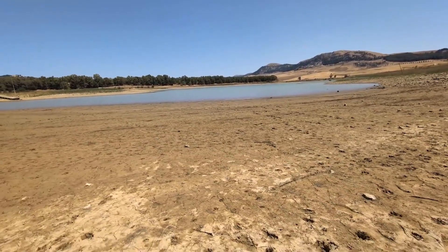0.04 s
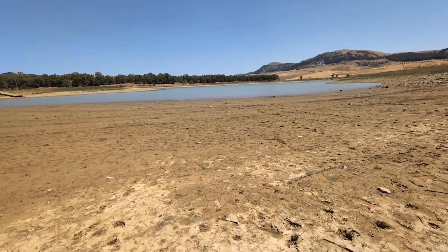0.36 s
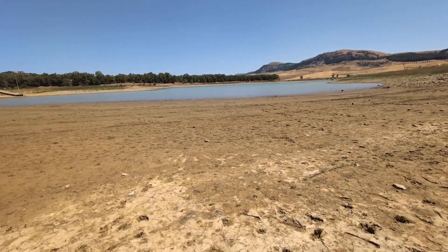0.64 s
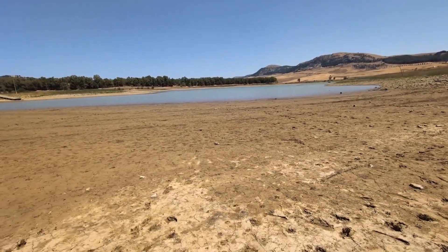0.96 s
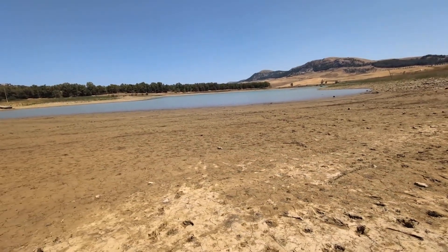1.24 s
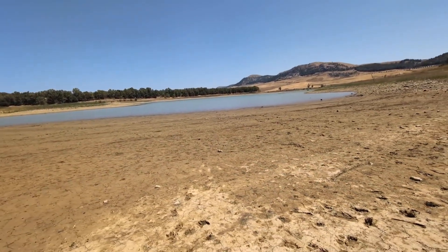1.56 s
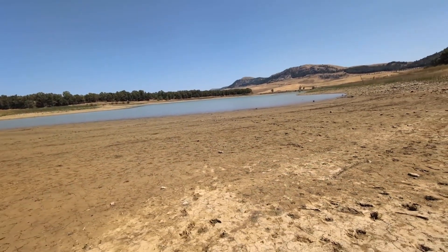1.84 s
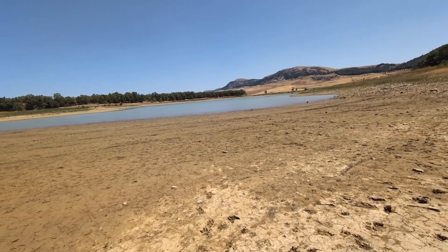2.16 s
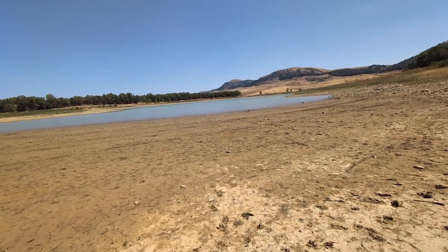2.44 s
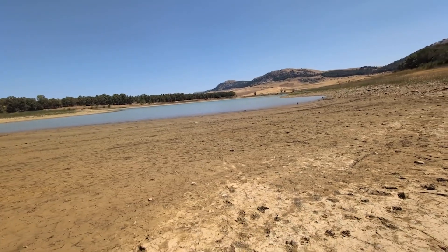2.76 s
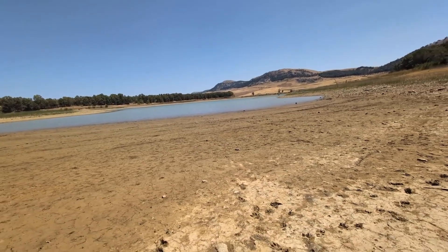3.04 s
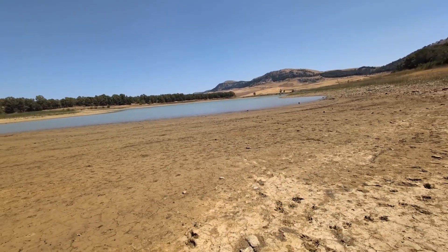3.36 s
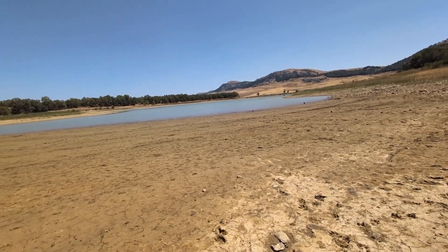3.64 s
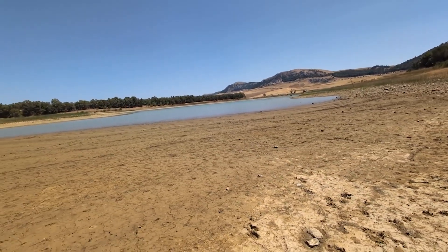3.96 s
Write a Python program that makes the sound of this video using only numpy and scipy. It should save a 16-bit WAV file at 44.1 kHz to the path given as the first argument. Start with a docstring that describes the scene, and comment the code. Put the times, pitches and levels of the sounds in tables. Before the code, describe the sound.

Crunchy steps on dried mud at a slow walk, with low fluttering wind.

```python
"""Slow footsteps on a dry, cracked lake bed, heard from a hand-held camera in light wind.
Each heel scuffs the crust, the sole rolls on and crumbles it, and loose grit settles with a fading hiss.
Clods crack with damped pops; hard grains tick. Wind rumbles, flutters and thumps on the two
microphone ports, over a faint hiss of open air."""
import sys
import numpy as np
from scipy import signal
from scipy.fft import rfft, irfft
from scipy.io import wavfile
from scipy.ndimage import uniform_filter1d

SR = 44100
rng = np.random.default_rng(int(sys.argv[2]) if len(sys.argv) > 2 else 0)


def dump(signal):
    """Clip the signal to [-1, 1] and save it as 16-bit WAV at the path in sys.argv[1]."""
    limited = np.clip(np.atleast_2d(signal).T, -1, 1)
    pcm = np.round(limited * 32767).astype(np.int16)
    wavfile.write(sys.argv[1], SR, pcm)


N = 176400
T = np.arange(N) / SR
HZ = np.fft.rfftfreq(N, 1 / SR)

# spectrum of scraped crust and crumbs (frequency [Hz], relative level [dB])
SCRAPE_SPECTRUM = [(150, -41), (450, 3), (900, -1), (1400, -3.5), (2100, -3), (2900, -14), (5000, -23),
                   (15000, -47)]


def amp(db):
    """Decibels to gain."""
    return 10 ** (np.asarray(db) / 20)


def unit(x):
    """Scale to rms 1."""
    return x / np.sqrt(np.mean(x ** 2) + 1e-20)


def curve(points):
    """Interpolate (frequency, value) points onto HZ, on a log axis."""
    hz, value = np.transpose(points)
    return np.interp(np.log(HZ + 1), np.log(hz), value)


def colour(x, spectrum):
    """Minimum-phase filter; output rms 1."""
    log_gain = np.log(amp(curve(spectrum)))
    phase = -signal.hilbert(np.r_[log_gain, log_gain[-2:0:-1]]).imag[:len(HZ)]
    return unit(irfft(rfft(x) * np.exp(log_gain + 1j * phase), N))


def add(mix, start_s, sound):
    """Mix a sound in at start_s."""
    part = mix[..., max(round(start_s * SR), 0):][..., :sound.shape[-1]]
    part += sound[..., :part.shape[-1]]


def patchy(x, depth_db=2.6, patch_hz=300, patch_s=.03):
    """Vary a hiss in random time-frequency patches; output rms 1."""
    frames = signal.stft(x, nperseg=512, noverlap=384)[2]
    field = rng.standard_normal(frames.shape[-2:])
    field = uniform_filter1d(field, round(patch_hz * 512 / SR), axis=0)
    field = uniform_filter1d(field, round(patch_s * SR / 128), axis=1)
    frames *= amp(depth_db * unit(field))
    return unit(signal.istft(frames, nperseg=512, noverlap=384)[1][..., :N])


def air(level_db=-77.5):
    """Faint hiss of open air."""
    # air spectrum (frequency [Hz], relative level [dB])
    air_spectrum = [(100, 0), (500, -1), (1000, -7), (1700, -8), (2500, -11), (3300, -15), (6000, -18),
                    (10000, -21), (12500, -22), (13500, -30), (15500, -36)]
    return amp(level_db) * patchy(colour(rng.standard_normal((2, N)), air_spectrum))


def eddies(depth_db, rate_hz=38, own_gain=.58):
    """Turbulence: noise that swells and drops out in lumps, partly shared by the ports."""
    shared, *own = noise = rng.standard_normal((3, N))
    drive = rfft(shared + own_gain * np.array(own))
    lumps = unit(irfft(drive / (1 + (HZ / rate_hz) ** 4), N))
    return rng.standard_normal((2, N)) * amp(depth_db * np.tanh(2 * lumps))


def wind():
    """Eddies at the ports: deep rumble, lumpy flutter, and a soft hiss that follows the gusts slowly."""
    # gust envelopes (time [s], relative level [dB])
    rumble_levels = [(0.0, -54.5), (0.17, -55.5), (0.18, -52), (0.22, -42.5), (0.31, -54.5), (0.34, -44),
                     (0.63, -52.5), (0.66, -46), (0.9, -51.5), (1.01, -39.5), (1.06, -48), (1.29, -48),
                     (1.44, -52), (1.46, -44.5), (2.08, -47), (2.09, -43), (2.34, -42.5), (2.38, -50.5),
                     (2.55, -43), (2.66, -50), (2.75, -44), (2.9, -43.5), (2.94, -59), (3.02, -49),
                     (3.06, -45.5), (3.2, -44.5), (3.23, -50), (3.3, -42.5), (3.53, -47.5), (3.58, -40),
                     (3.68, -52), (3.7, -43), (3.95, -48.5), (4.0, -38)]
    flutter_levels = [(0.0, -66), (0.07, -64), (0.17, -70), (0.2, -49.5), (0.27, -54), (0.315, -75),
                      (0.335, -53.5), (0.4, -58), (0.49, -75.5), (0.53, -61), (0.61, -71.5), (0.63, -57),
                      (0.69, -61.5), (0.92, -71.5), (0.955, -46.5), (1.18, -61.5), (1.27, -52), (1.31, -66),
                      (1.48, -55), (1.71, -54.5), (1.82, -51.5), (1.87, -62.5), (1.95, -51), (2.23, -47.5),
                      (2.25, -46), (2.34, -61), (2.44, -48), (2.66, -58.5), (2.67, -45), (2.78, -66),
                      (2.83, -46.5), (2.93, -77), (2.96, -50.5), (3.0, -70.5), (3.06, -50.5), (3.17, -55.5),
                      (3.38, -50), (3.66, -51), (3.69, -42), (3.72, -51), (4.0, -52)]
    # wind spectra (frequency [Hz], relative level [dB])
    rumble_spectrum = [(15, -60), (31, -60.5), (40, -21), (52, -6), (70, 2.5), (95, -0.5), (130, -4),
                       (180, -9), (260, -34), (500, -53.5), (1000, -82)]
    flutter_spectrum = [(60, -21), (120, -2), (190, 1), (280, -2.5), (400, -10.5), (520, -18.5), (680, -29),
                        (1000, -46), (2000, -52.5), (5000, -65.5)]
    hiss_spectrum = [(200, -22), (600, -1.5), (1000, -1.5), (1700, -5.5), (2500, -5.5), (3200, -14.5),
                     (6000, -18), (15000, -47.5)]
    rumble_gain = amp(np.interp(T, *np.transpose(rumble_levels)))
    flutter_gain = amp(np.interp(T, *np.transpose(flutter_levels)))
    hiss_gain = uniform_filter1d(flutter_gain, round(.13 * SR))
    rumble = rumble_gain * colour(eddies(depth_db=6.5), rumble_spectrum)
    flutter = flutter_gain * colour(eddies(depth_db=5.5), flutter_spectrum)
    hiss = hiss_gain * patchy(colour(rng.standard_normal((2, N)), hiss_spectrum))
    return amp(3) * rumble + amp(4.5) * flutter + amp(-24) * hiss


def thumps(rise_cycles=.3, fall_cycles=.69):
    """A sharp eddy gives a dull push of a cycle or two, its phase different at each port."""
    # air thumps (time [s], level [dB], pitch [Hz])
    thump_events = [(.203, -43, 406), (0.218, -45, 145), (0.257, -44, 260), (0.362, -35.5, 157),
                    (0.403, -37, 140), (.638, -39.5, 370), (0.96, -47, 344), (1.000, -33.5, 340),
                    (1.006, -27.5, 107), (1.112, -44, 366), (1.268, -37, 105), (1.539, -37.5, 296),
                    (1.799, -34, 200), (1.965, -33.5, 261), (2.014, -36.5, 250), (2.163, -30, 192),
                    (2.174, -34.5, 107), (2.253, -31, 212), (2.678, -36.5, 295), (2.750, -34, 280),
                    (2.837, -46.5, 313), (3.07, -47, 328), (3.357, -37.5, 278), (3.688, -29.5, 354),
                    (3.7, -28.5, 204), (3.814, -48, 377)]
    out, lead_s = np.zeros((2, N)), .05
    for time_s, db, hz in thump_events:
        cycles = (T[:SR // 10] - lead_s) * hz
        envelope = np.exp(-(cycles / np.where(cycles < 0, rise_cycles, fall_cycles)) ** 2)
        phase = 2 * np.pi * (cycles + rng.random() + .48 * rng.random((2, 1)))
        add(out, time_s - lead_s, amp(db) * envelope * np.sin(phase))
    return out


def ports(x, left_lag_s=.00016):
    """Ground sound to stereo: direct row 0 reaches the right port first; rows 1, 2 are scatter."""
    # likeness of the ports (frequency [Hz], direct share of power [0-1])
    likeness = [(300, 0.54), (900, 0.97), (1700, 0.4), (2500, 0.49), (4500, 0.14), (6300, 0.68),
                (7500, 0.11), (9500, 0.097), (12000, 0.64), (15000, 0.93)]
    # port balance (frequency [Hz], left minus right [dB])
    balance = [(500, -1), (1400, 0), (2700, 0.5), (3800, 0), (5000, 1), (7000, -0.5), (9500, -2),
               (12000, -3.5), (13600, 7.5), (15500, -31)]
    fade_in = np.minimum(T / .008, 1) ** 2
    spectra = rfft(x * fade_in)
    direct = np.array([spectra[0] * np.exp(-2j * np.pi * HZ * left_lag_s), spectra[0]])
    share, side_db = curve(likeness), curve(balance) / 2
    blend = np.sqrt(share) * direct + np.sqrt(1 - share) * spectra[1:]
    return irfft(blend * amp([side_db, -side_db]), N)


def fractures(spectrum, per_s, spread_db=1):
    """Tiny fractures of uneven size; rows: direct, scattered left, scattered right."""
    size = amp(spread_db * np.minimum(rng.exponential(1, (3, N)), 4))
    sign = rng.choice([-1., 1.], (3, N))
    hits = rng.random((3, N)) < per_s / SR
    return colour(size * sign * hits, spectrum)


def ticks(trail_db=-20, trail_s=.0076):
    """Hard grains snap or skid: bright bursts, each trailed by a little falling sand."""
    # grain ticks (time [s], length [s], level [dB], centre [Hz], width [oct], left minus right [dB])
    tick_events = [(0.06, 0.0011, -58.5, 3980, 0.41, -4), (.551, .008, -73, 4130, 0.29, 0),
                   (0.68, 0.011, -70.5, 6160, 0.26, -1), (0.864, 0.0083, -64, 10900, 0.55, -2),
                   (0.999, 0.0046, -66, 4380, 0.66, -1), (1.057, 0.041, -73, 4200, 0.86, 1),
                   (1.137, 0.0035, -68, 10900, 0.61, 1), (1.239, 0.0049, -56.5, 5100, 0.6, 0),
                   (1.373, 0.0014, -58, 5500, 0.68, -11), (1.539, 0.012, -61.5, 7500, 1, 1),
                   (2.058, 0.0027, -55.5, 3740, 1, 13.5), (2.244, 0.02, -53, 12000, 1.2, -3.5),
                   (2.584, 0.003, -63, 6170, 0.66, -4), (2.592, 0.056, -78.5, 7300, 0.72, -2),
                   (2.783, .003, -74, 8000, .8, 4), (2.971, 0.0077, -64.5, 12000, 0.54, 1),
                   (2.981, 0.0019, -60, 2720, 0.8, 4), (3.326, 0.058, -77, 3980, 0.91, 0),
                   (3.663, 0.0021, -67, 10000, 0.71, 1), (3.802, 0.0049, -73, 3500, 0.86, 0),
                   (3.878, 0.0023, -67, 4400, 0.79, -6)]
    out, t = np.zeros((2, N)), T[:SR // 10]
    hz = np.fft.rfftfreq(len(t), 1 / SR) + 1
    trail = amp(trail_db) * np.exp(-t / trail_s)
    for start_s, length_s, db, centre_hz, width_oct, pan_db in tick_events:
        band = np.exp(-.5 * (np.log2(hz / centre_hz) / width_oct) ** 2)
        burst = unit(irfft(rfft(rng.standard_normal((2, len(t)))) * band, len(t)))
        envelope = np.sin(np.pi * np.minimum(t / length_s, 1) ** .99) + trail
        add(out, start_s, burst * envelope * amp([[db + pan_db / 2], [db - pan_db / 2]]))
    return out


def cracks(rise_s=.0003, decay_cycles=.85, spray_db=-13.5, spray_fall_s=.0055):
    """A clod breaks: a heavily damped pop and a brief spray of crumbs."""
    # clod cracks (time [s], level [dB], pitch [Hz])
    crack_events = [(0.0317, -44, 780), (0.06, -57, 900), (0.0690, -43, 765), (.081, -54, 800),
                    (0.1473, -49, 790), (.541, -58.5, 1500), (.697, -51.5, 1050), (.773, -58, 1300),
                    (0.788, -47, 1420), (.999, -46.5, 605), (1.2392, -37.5, 1510), (1.261, -56, 1400),
                    (1.275, -43, 1150), (1.282, -47, 1750), (1.293, -54, 950), (1.351, -45, 1370),
                    (1.357, -53, 1280), (1.366, -47, 940), (1.374, -46, 1680), (1.383, -42, 1520),
                    (1.391, -50, 810), (1.402, -45.5, 950), (1.41, -53, 895), (1.446, -47, 1010),
                    (1.458, -40, 1000), (1.4698, -48.5, 950), (1.478, -53, 850), (1.677, -55.5, 1120),
                    (2.058, -46.5, 1080), (2.123, -47, 1680), (2.134, -48, 930), (2.154, -50, 800),
                    (2.24, -56, 800), (2.779, -51.5, 1870), (2.785, -54, 1510), (2.833, -52.5, 724),
                    (2.961, -52, 1000), (3.083, -53, 1320), (3.089, -54.5, 1090), (3.427, -48.5, 1400),
                    (3.456, -51, 785), (3.487, -42.5, 840), (3.518, -44.5, 970), (3.527, -48.5, 1600),
                    (3.559, -49, 1200), (3.608, -53, 1080), (3.619, -59, 1160), (3.633, -53, 1480),
                    (3.650, -44, 930), (3.655, -57, 1160), (3.729, -50.5, 840), (3.748, -47, 1150),
                    (3.775, -55, 1470), (3.793, -51.5, 970), (3.827, -62, 1100), (3.987, -49.5, 950)]
    pops, spray, t = np.zeros((3, N)), np.zeros(N), T[:SR // 40]
    for start_s, db, hz in crack_events:
        ring = np.sin(2 * np.pi * (hz * t + rng.random((3, 1))))
        envelope = (1 - np.exp(-t / rise_s)) * np.exp(-t * hz / decay_cycles)
        add(pops, start_s, amp(db) * ring * envelope / envelope.max())
        add(spray, start_s, amp(db + spray_db) * np.exp(-t / spray_fall_s))
    return ports(pops + spray * fractures(SCRAPE_SPECTRUM, per_s=1100))


def steps(heel_fall_s=.0069, roll_fall_s=.038, settle_crumble_db=-9.5):
    """Heel and sole grind fine grit and crumble the crust; the grit settles after each step."""
    # heel scuffs (time [s], rise [s], length [s], grit [dB], scrape [dB], grit tilt [dB/oct])
    heels = [(0.0, .002, 0.022, -73, -61, 2), (0.488, .04, 0.11, -76, -80, -4.5),
             (0.606, 0.02, 0.061, -70.5, -78, -0.5), (0.663, .012, 0.039, -73.5, -68, -2),
             (1.236, 0.0075, 0.062, -58, -59, 8), (2.007, 0.0091, 0.037, -72.5, -92, -0.5),
             (2.062, 0.0036, 0.028, -64.5, -74, -2.5), (2.713, 0.015, 0.1, -72.5, -67, -0.5),
             (2.768, 0.02, 0.011, -81, -67.5, -1), (3.417, 0.004, 0.061, -69, -67, -2)]
    # sole rolls (full weight at [s], rise [s], grit [dB], crumble [dB], settling [dB], its fade [dB/s])
    rolls = [(0.067, 0.039, -77, -59.5, -65, 62), (.79, 0.077, -78, -83, -71.5, 12),
             (1.378, 0.044, -76, -56.5, -66, 76), (1.467, 0.034, -60, -80, -69, 66),
             (2.149, 0.043, -65.5, -65.5, -71, 48), (2.877, 0.035, -85, -68, -69.5, 61),
             (3.505, 0.023, -67.5, -58, -73, 38), (3.63, 0.03, -75, -69, -81, 31)]
    # spectra of fine grit and crumbling crust (frequency [Hz], relative level [dB])
    grit_spectrum = [(300, -72.5), (1000, 10.5), (2200, 11.5), (3200, 8), (4500, 7.5), (6000, 4.5),
                     (7400, 3), (9500, 7), (11300, 2), (13500, 1.5), (15500, -8)]
    crumble_spectrum = [(150, -37.5), (400, -0.5), (800, -1.5), (1200, -7.5), (1800, -12.5), (2500, -26.5),
                        (4000, -26), (8000, -48), (15000, -66)]
    grit = patchy(fractures(grit_spectrum, per_s=6600, spread_db=3.5))
    crumble = fractures(crumble_spectrum, per_s=990)
    scrape = fractures(SCRAPE_SPECTRUM, per_s=1100)
    heel_grit = rfft(patchy(fractures(grit_spectrum, per_s=6600, spread_db=3.5)))
    scuffs, grit_power, crumble_power = np.zeros((3, N)), np.zeros(N), np.zeros(N)
    for start_s, rise_s, length_s, grit_db, scrape_db, tilt_db in heels:
        release = np.exp(-np.maximum(T - start_s - length_s, 0) / heel_fall_s)
        press = np.clip((T - start_s) / rise_s, 0, 1) * release
        sand = unit(irfft(heel_grit * amp(tilt_db * np.log2(HZ + 1000)), N))
        scuffs += press * (amp(grit_db) * sand + amp(scrape_db) * scrape)
    for peak_s, rise_s, grit_db, crumble_db, settle_db, fade_db_per_s in rolls:
        onset = np.exp(-(np.minimum(T - peak_s, 0) / rise_s) ** 2)
        after_s = np.maximum(T - peak_s, 0)
        press = onset * np.exp(-after_s / roll_fall_s)
        settle = np.sqrt(onset) * amp(settle_db - fade_db_per_s * after_s)
        grit_power += (amp(grit_db) * press) ** 2 + settle ** 2
        crumble_power += (amp(crumble_db) * press) ** 2 + onset * (amp(settle_crumble_db) * settle) ** 2
    return ports(scuffs + grit * np.sqrt(grit_power) + crumble * np.sqrt(crumble_power))


def scene():
    """Footsteps under wind."""
    return steps() + cracks() + ticks() + wind() + thumps() + air()


def record(dry):
    """Camera low cut and band limit; 4 ms fade at both ends."""
    low_cut_hz, high_cut_hz = 34, 15600
    fade = np.clip(np.minimum(T, T[-1] - T) / .004, 0, 1)
    highpass = 1 - 1 / (1 + (HZ / low_cut_hz) ** 10)
    thinned = irfft(rfft(dry * fade) * highpass, N)
    lowpass = signal.firwin(401, high_cut_hz, window=("kaiser", 8), fs=SR)
    return signal.oaconvolve(thinned, lowpass[None], "same")


dry = scene()
out = record(dry)
dump(out)
```